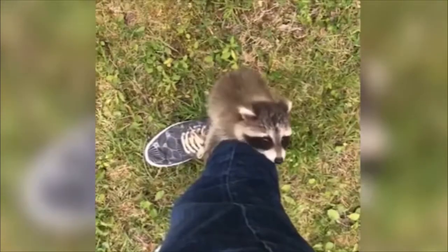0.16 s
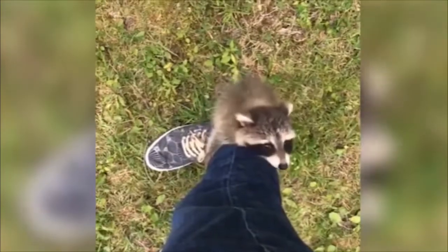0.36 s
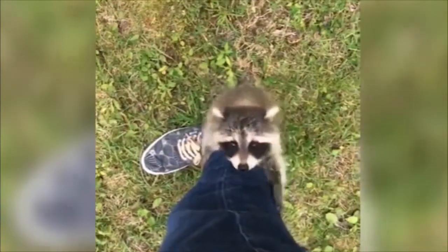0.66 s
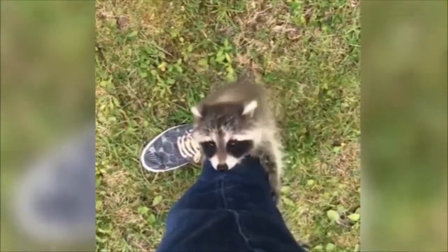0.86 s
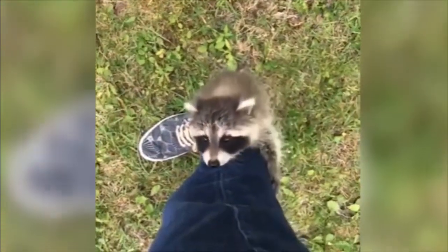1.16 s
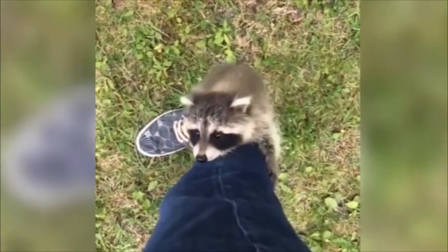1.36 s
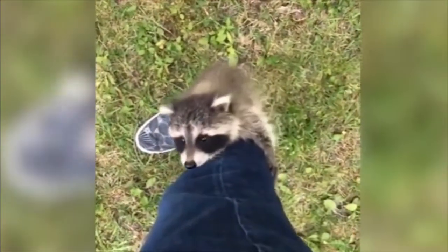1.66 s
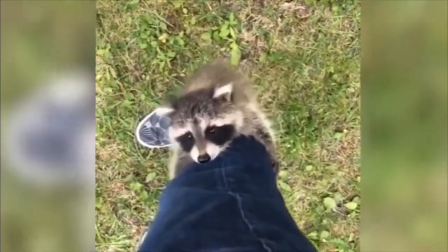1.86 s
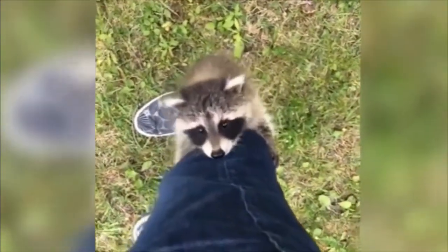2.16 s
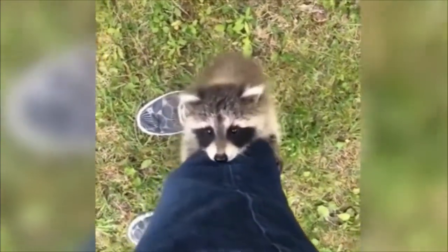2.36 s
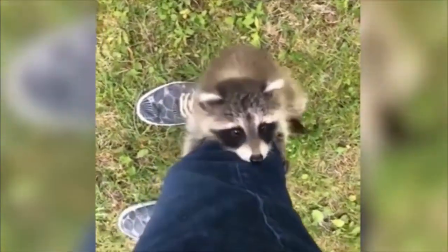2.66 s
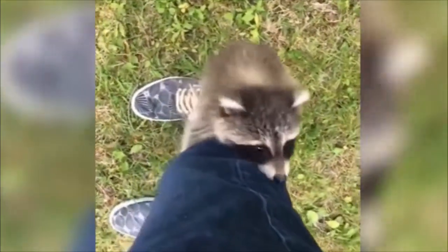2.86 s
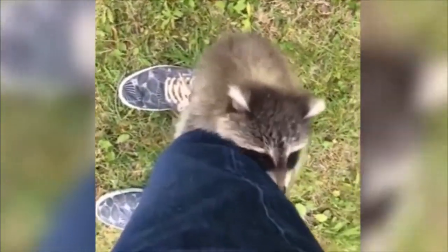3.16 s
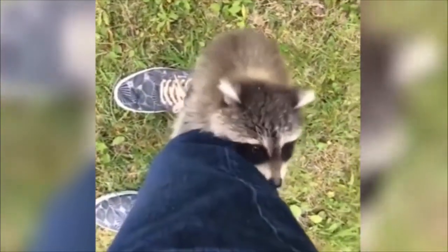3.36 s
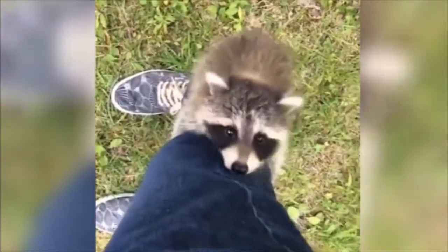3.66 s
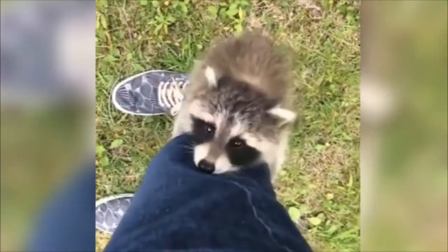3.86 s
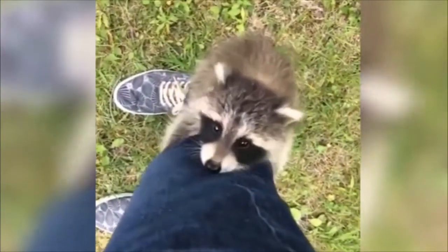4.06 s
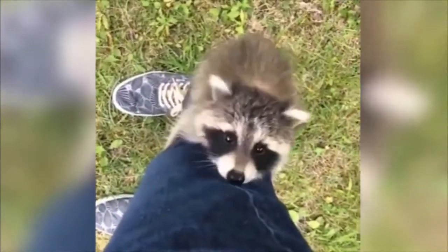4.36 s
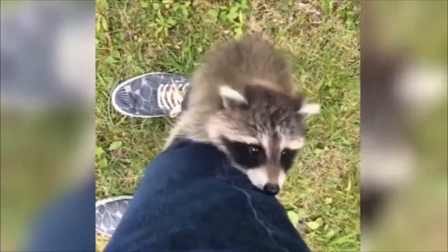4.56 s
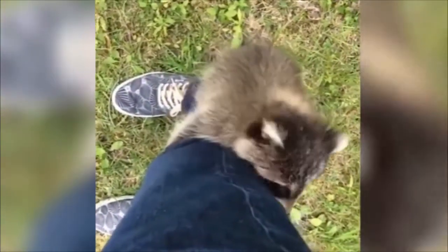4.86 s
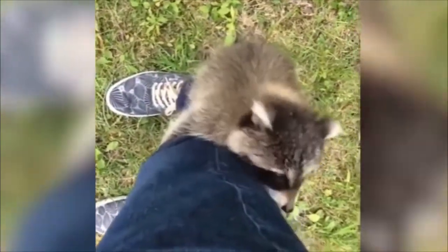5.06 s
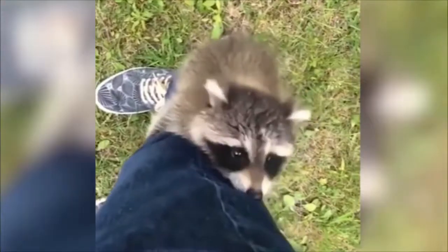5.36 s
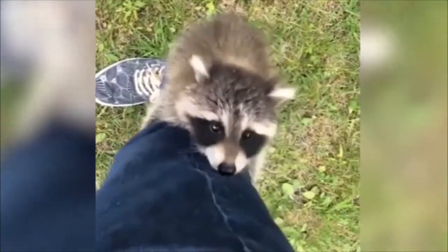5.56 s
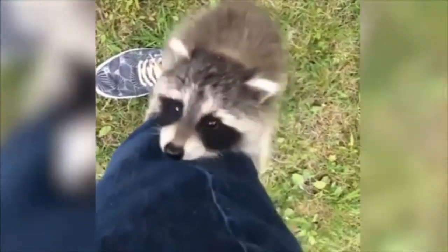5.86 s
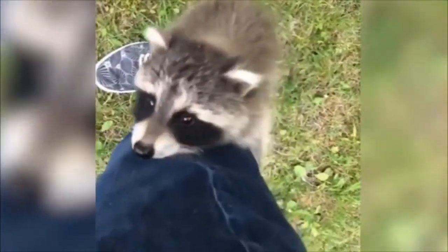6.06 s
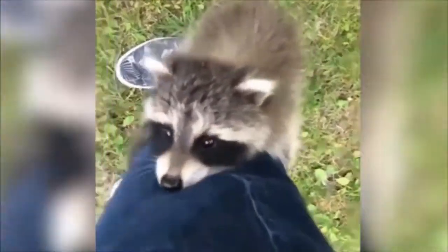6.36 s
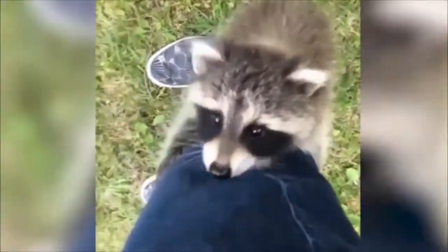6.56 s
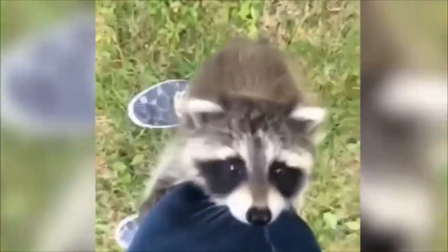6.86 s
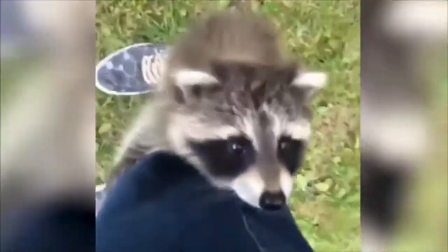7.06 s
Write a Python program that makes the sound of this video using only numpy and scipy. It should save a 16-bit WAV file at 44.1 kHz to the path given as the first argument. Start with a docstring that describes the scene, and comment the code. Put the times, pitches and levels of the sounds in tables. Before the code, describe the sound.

Rapid, raspy chirps and thin squeaks from a young raccoon up close, then claws snap on cloth and something bumps the microphone.

```python
"""Baby raccoon on a trouser leg

On a lawn, close up, on a hand-held phone. The raccoon chitters in runs of about 17 chirps a second,
each a few rough cycles of its voice, often led in by a thin squeak. As it climbs, claws catch the
denim, cloth rustles and air buffets the microphone; near the end something knocks and scrapes
against the phone. A soft outdoor hum lies far behind."""
import sys
import numpy as np
from scipy import signal
from scipy.fft import rfft, irfft
from scipy.io import wavfile
from scipy.ndimage import uniform_filter1d

SR = 44100
rng = np.random.default_rng(int(sys.argv[2]) if len(sys.argv) > 2 else 0)


def int16_out(signal):
    """Quantize to a 16-bit WAV file."""
    q = np.round(np.clip(np.atleast_2d(signal).T, -1, 1) * 32767)
    wavfile.write(sys.argv[1], SR, q.astype(np.int16))


N = 318402
T = np.arange(N) / SR

# chirps, run by run: t/s, relative level/dB, pitch/Hz, mouth against fundamental/dB, half length/s
CHIRPS = [(0.048, -34.5, 657, -10, 0.0037), (0.153, -36.5, 724, -9, 0.0034),
          (0.261, -35, 764, -5.5, 0.0026), (0.318, -41, 673, -2, 0.0035), (0.373, -35, 670, -7, 0.0045),
          (0.431, -33.5, 673, -10, 0.0033), (1.019, -47, 700, 13, 0.0034), (1.072, -34, 687, 15, 0.0019),
          (1.129, -27.5, 670, 4.5, 0.005), (1.196, -32, 635, 7, 0.0038), (2.581, -49, 620, -7, 0.0036),
          (2.636, -42.5, 689, -5, 0.0025), (2.695, -39.5, 762, 2, 0.0023), (2.757, -29.5, 654, -2, 0.0026),
          (2.813, -40.5, 649, 0, 0.0045), (2.873, -26, 684.4, -4, 0.0034), (2.934, -39, 712, -3, 0.0043),
          (3.518, -32, 709, -12.5, 0.0062), (3.579, -44, 626, 3, 0.0034), (3.638, -29.5, 635, 0.5, 0.0035),
          (3.692, -37.0, 622, 1, 0.0026), (3.75, -28.5, 607.4, 0, 0.0029), (4.412, -47, 628, -6, 0.0018),
          (4.448, -42.5, 800, 2.5, 0.0033), (4.501, -44, 639, 4, 0.0017), (4.553, -33.5, 685, 8.5, 0.0035),
          (4.605, -36, 710, 8, 0.0031), (4.657, -34.5, 680, 13, 0.0024), (4.708, -32, 697, 8, 0.0055),
          (4.761, -45.5, 630, 10, 0.0031), (4.808, -37, 655, -3.5, 0.0048), (4.861, -37.5, 641, -7, 0.0054),
          (4.913, -40, 640, -1.5, 0.0036), (4.968, -39, 636, -5.5, 0.0053), (5.026, -46.5, 608, 7, 0.0032),
          (5.076, -40, 654, -3, 0.0035), (5.133, -36.5, 640, -6, 0.0043), (5.195, -35.5, 619, -6, 0.0068),
          (5.247, -34.5, 627, 2.5, 0.0043), (5.303, -34, 619, 9, 0.0034), (5.36, -33, 549.6, 12, 0.0021),
          (5.98, -42.5, 682, -1, 0.0032), (6.034, -33, 611, 2, 0.0032), (6.093, -30.5, 597, 1.5, 0.0049),
          (6.149, -31.5, 647, 0, 0.0033), (6.208, -25.5, 654, 2, 0.0026), (6.266, -34, 632.5, 3, 0.0029),
          (6.322, -28.5, 640, 5, 0.0018), (6.378, -31, 609, 9, 0.0048), (6.444, -32, 620, 4, 0.0044),
          (6.508, -44.5, 710, 10, 0.0042), (6.574, -38.5, 733, 0, 0.0088), (6.639, -32.5, 747, 0, 0.0026),
          (6.699, -37.5, 700, 14, 0.0041), (6.823, -35.5, 654, 11, 0.0044)]
# vocal strain: t/s, rasp against mouth/dB, tick against chirp/dB, whistle against mouth/dB,
# throat tuning/ratio
STRAIN = [(.3, -11, -23, -5, 0.85), (1.13, -17, -31, 1.5, 1), (2.8, -22, -42, -1, 1),
          (3.7, -18, -25, -2.5, 1.033), (4.65, -17, -33.5, 1, 0.96), (4.8, -1, -19, -1, 1.07),
          (5.36, -3.5, -38, 1.5, 0.97), (6.05, -9.5, -27, 2, 0.88), (6.3, -5, -23, 3, 0.94),
          (6.8, -2, -13, 1, 0.91)]
# how unevenly the folds flap: t/s, roughness/0-1
FOLD_ROUGHNESS = [(.3, .35), (2.8, .6), (3.7, .45), (4.65, .55), (5.36, .7), (6.05, .9), (6.3, .75),
                  (6.8, .9)]
# mouth resonance: t/s, f/Hz
MOUTH_RESONANCE = [(.43, 1340), (1.05, 1420), (2.7, 1480), (3.62, 1458), (4.55, 1384), (4.71, 1536),
                   (5.35, 1678), (6.0, 1670), (6.2, 1973), (6.62, 1868)]
# upper throat resonances: f/Hz, width/Hz, gain/dB
THROAT_MODES = [(2250, 300, 5.5), (2613, 300, 8.5), (3090, 180, 0), (4420, 340, -7.5)]
# resonances of the wet tick: f/Hz, width/Hz, gain/dB
TICK_MODES = [(3630, 700, 0), (5380, 310, 3), (7300, 700, -6)]
# the band the nasal cavity swallows: t/s, f/Hz
NASAL_NOTCH = [(1.13, 2250), (2.8, 1820), (4.9, 1920), (5.1, 2370), (5.4, 2340), (6.0, 2600), (6.5, 2510)]
# squeaks ahead of the chirps: t/s, starting pitch/Hz, relative level of tone/dB, of octave/dB
LEAD_SQUEAKS = [(4.5, 1216, -48, -58), (4.66, 1266, -58, -65), (4.8, 1400, -62, -61),
                (5.18, 1440, -62, -58), (5.3, 1443, -64, -53), (6.05, 1227, -54, -53.5),
                (6.3, 1209, -53.5, -50), (6.6, 1202, -67, -48), (6.82, 1215, -66, -54)]
# individually shaped squeaks and squeals, most leading into or overlapping a chirp:
# start/s, end/s, roughness/0-1, first f/Hz, last f/Hz, relative level of tone/dB, of octave/dB
SHAPED_SQUEAKS = [(0.456, 0.521, 0.7, 1637, 1510, -52.5, -65), (0.479, .518, 0.24, 2035, 1850, -48.5, -74),
                  (1.044, 1.08, 0.2, 1270, 1145, -49, -53), (1.102, 1.135, 0.64, 1800, 2060, -46.5, -73),
                  (1.146, 1.215, 0.8, 1630, 1695, -47, -69), (4.678, 4.719, 0.8, 1457, 1529, -45, -52.5),
                  (4.686, 4.721, 0.3, 2244, 2275, -51, -60), (4.735, 4.758, .3, 1380, 1190, -59, -55.5),
                  (6.126, 6.15, 0.2, 1233, 1030, -57, -48), (6.361, 6.379, 0.3, 1194, 1070, -41, -47),
                  (6.492, 6.513, 0.2, 1184, 1096, -50, -49), (6.794, 6.816, 0.2, 1264, 1180, -60, -43.5)]
# rasp through the most strained run: t/s, relative level/dB
HOARSE_LEVEL = [(4.66, -75), (4.70, -49), (4.75, -55), (4.8, -48.5), (4.92, -46), (5.02, -50.5),
                (5.18, -48), (5.24, -44), (5.37, -50), (5.44, -75)]
# resonances of that rasp: f/Hz, width/Hz, gain/dB
HOARSE_MODES = [(1610, 420, 1), (2200, 160, 3.5), (2670, 320, -2.5), (3010, 190, 3), (4150, 240, -5)]

# fur and paws stroking the denim: t/s, width/s, relative level/dB
RUBS = [(.28, 0.34, -58), (1.18, 0.094, -54.5), (2.42, 0.26, -49.5), (2.92, 0.18, -52), (3.72, 0.08, -56),
        (5.28, 0.093, -51.5), (5.7, 0.99, -52.5), (6.285, 0.032, -42), (6.42, 0.12, -43.5),
        (6.705, .012, -39), (6.74, 0.023, -32.5), (6.8, 0.13, -40), (6.92, 0.018, -38), (7.05, 0.17, -53.5)]
# their spectrum: f/Hz, gain/dB
RUB_SPECTRUM = [(100, 10), (300, 7.5), (1500, -1), (3000, -3), (4500, -3.5), (5800, -2.5), (7500, -1.5),
                (11000, -3.5), (12000, -10)]
# rustle of holding on: f/Hz, gain/dB
CLING_SPECTRUM = [(100, -1.5), (300, 14), (1500, -0.5), (3000, 0), (4500, -7), (5800, 3.5), (7500, -1),
                  (10500, -4), (12000, -10.5)]
# the trouser leg shifting: t/s, width/s, level/dB
CLOTH_SHIFTS = [(2.37, 0.1, -55.5), (4.045, 0.014, -49.5), (6.98, 0.039, -49.5), (7.086, 0.007, -42.5)]
# claws snapping in the cloth: t/s, peak/dB, decay/s
CLAW_SNAPS = [(6.2668, -11, 0.00037), (6.279, -3.5, 0.00078), (7.085, -35.5, 0.0048)]
# their spectrum: f/Hz, gain/dB
CLAW_SPECTRUM = [(60, -11), (200, 7), (600, -3), (1600, 10), (3300, 2.5), (5000, -12), (8000, -7.5),
                 (12000, -25)]

# modes of the phone's case: f/Hz, width/Hz, gain/dB
CASE_MODES = [(352, 124, -5), (653, 74, -3), (1053, 41, -0.5), (1170, 39, -4.5), (1324, 32, -3),
              (1543, 39, -5), (1707, 28, 1.5), (2130, 42, -4.5), (3020, 38, -6.5), (3300, 44, -5),
              (4180, 37, -2)]
# contact noise through the case: f/Hz, gain/dB
CASE_SPECTRUM = [(60, 5), (200, 2), (400, 3.5), (1200, 2), (1800, -2), (2600, -1), (4800, -2), (6000, 1),
                 (7200, -7.5), (9000, -16), (12000, -13)]
# scrapes over the case: t/s, width/s, level/dB
SCRAPES = [(6.72, 0.0092, -28.5), (6.745, 0.017, -20), (6.845, 0.055, -40)]
# slower, duller drags after them: t/s, width/s, level/dB
DRAGS = [(6.85, 0.034, -37.5), (6.915, .017, -30.5)]
# their spectrum: f/Hz, gain/dB
DRAG_SPECTRUM = [(80, 1.5), (620, 0.5), (1000, -10), (1500, -13), (2300, -9), (3000, -24), (9000, -26)]
# knocks on the case: t/s, peak/dB, contact time/s
KNOCKS = [(6.7321, -5, 0.00016), (6.7372, -14, 0.000065), (6.7536, -10.5, 0.00012)]
# soft bumps on the phone: t/s, f/Hz, width/s, envelope peak/dB
BUMPS = [(4.496, 43.8, 0.014, -23.5), (4.606, 49.6, 0.022, -28.5), (4.877, 38.3, 0.031, -23.5),
         (5.519, 48, 0.017, -25.5), (5.646, 34.7, 0.026, -21), (6.248, 42, 0.018, -24.5),
         (6.285, 191, 0.0088, -31.5), (6.899, 109, 0.014, -30), (6.941, 133, 0.0091, -26.5),
         (6.951, 61, 0.0053, -18.5), (7.101, 63.7, 0.0094, -27)]

# gusts on the microphone: t/s, width/s, level/dB
GUSTS = [(4.39, 0.034, -35.5), (4.8, 0.1, -40), (5.6, 0.1, -33.5), (5.84, 0.03, -37), (6.21, 0.1, -33),
         (6.49, 0.027, -32.5), (6.85, 0.16, -35)]
# their spectrum: f/Hz, gain/dB
GUST_SPECTRUM = [(15, -4), (35, 7), (60, -0.5), (90, -5), (130, -20.5), (300, -33.5), (700, -69)]
# steady air on the microphone: f/Hz, gain/dB
BREEZE_SPECTRUM = [(15, -10), (35, 4), (60, -2), (90, -15), (130, -15), (300, -53), (700, -65)]
# distant outdoor hum: f/Hz, gain/dB
HUM_SPECTRUM = [(30, 8), (75, 7.5), (130, 1.5), (200, -6), (400, -14), (620, -2), (1000, 1), (1250, -2),
                (1650, -11), (2200, -15.5), (4500, -17.5), (9000, -29.5)]
# its rise and fall: t/s, relative level/dB
HUM_LEVEL = [(0, -49.5), (1.0, -54), (3.6, -55.5), (5.8, -55.5), (6.6, -53), (7.2, -63.5)]
# a faint low drone: t/s, level/dB
DRONE_LEVEL = [(.6, -67), (1.2, -56), (2.5, -57.5), (3.1, -65)]


def raccoon(squeak_db=5.5, notch_width_hz=120):
    """The voice, close to the microphone: chirps, squeaks and rasp, notched by the nasal cavity."""
    voice = chitter() + amp(squeak_db) * squeaks() + hoarseness()
    return voice - moving_ring(voice, curve(NASAL_NOTCH), notch_width_hz)


def chitter(mouth_scatter=.06):
    """Runs of chirps; opening the mouth shifts power from the fundamental to its resonance."""
    out = np.zeros(N)
    shapes = rng.uniform(-1.006, 1, len(CHIRPS))  # the mouth never opens the same way twice
    for (s, db, pitch_hz, open_db, half_s), shape in zip(CHIRPS, shapes):
        mouth_hz = at(MOUTH_RESONANCE, s)[0] * (1 + mouth_scatter * shape)
        voice_db = db - 10 * np.log10(1 + amp(open_db) ** 2)
        call = chirp(s, half_s, pitch_hz, mouth_hz, voice_db, voice_db + open_db)
        add(out, s - len(call) / SR / 2, call)
    return out


def chirp(s, half_s, pitch_hz, mouth_hz, voice_db, mouth_db, hiss_db=-15, hum_db=-26):
    """The folds flap for a few uneven cycles and ring the mouth; a whistle joins, strain adds rasp."""
    rasp_db, tick_db, whistle_db, tuning = at(STRAIN, s)
    rough = at(FOLD_ROUGHNESS, s)[0]
    clean = np.sqrt(1 - rough ** 2)
    t = np.arange(-int(.06 * SR), int(.06 * SR)) / SR
    push = np.exp(-.5 * abs(t / (half_s * np.where(t < 0, .87, .74))) ** 1.58)
    opening = np.interp(t - .0002, t, push) ** 1.05  # lags just behind the push
    skirt = np.exp(-abs(t) / np.where(t < 0, .062, .068))  # weak hoarse build-up and fade

    wobble = (.043 + .058 * rough ** 4) * unit(uniform_filter1d(noise(len(t)), size=60))
    phase = phase_of(pitch_hz * (1 + .06916 * (push - .8) + wobble))  # pitch arches with the push
    pulses = unit(sum(np.cos(k * phase) for k in range(2, 7)))
    hiss = rough * unit(band(noise(len(t)), 790, 2700, order=1))
    folds = opening * (clean * pulses + hiss) + amp(hiss_db) * skirt * hiss
    puff = push * unit(band(noise(len(t)), 220, 1050, order=2))
    voice = (push + amp(hum_db) * skirt) * np.cos(phase) + rough ** 2 * puff / 2

    # the whistle slides upward through the mouth resonance
    whistle = opening * np.cos(phase_of(mouth_hz * (1 + .0594 * np.tanh(t / half_s) + wobble)))
    mouth = band(ring(folds, mouth_hz, width=600), 1095, 1.327 * mouth_hz + 150, order=3)
    mouth = unit(mouth) + amp(whistle_db) * clean * unit(whistle)
    tract = unit(mouth) + amp(rasp_db) * throat(folds, THROAT_MODES, tuning)
    tick = wet_tick(push * np.exp(-(2 * t / half_s) ** 2)) * np.hypot(amp(voice_db), amp(mouth_db))
    return .36 * (amp(voice_db) * unit(voice) + amp(mouth_db) * tract + amp(tick_db) * tick)


def throat(x, modes, tuning=1):
    """The throat's resonances shape a rasp, rms 1."""
    return unit(sum(amp(db) * ring(ring(x, tuning * hz, width), tuning * hz, 2 * width)
                    for hz, width, db in modes))


def wet_tick(envelope, scatter_db=4):
    """The folds part with a wet tick that rings a little differently each time."""
    burst = envelope * noise(len(envelope))
    return unit(sum(amp(db + scatter_db * rng.standard_normal()) * ring(burst, hz, width)
                    for hz, width, db in TICK_MODES))


def squeaks(lead_s=.022, gap_s=.00099, usual_chirp_db=-35):
    """A falling squeak, often hoarse, leads into each later chirp; individually shaped ones join in."""
    out = np.zeros(N)
    for (s, chirp_db, *_), (stretch, bend, force, fray) in zip(
            CHIRPS, rng.uniform(-1, 1, (len(CHIRPS), 4))):
        if s > LEAD_SQUEAKS[0][0] - lead_s:
            hz, db, octave_db = at(LEAD_SQUEAKS, s)
            length = lead_s * (1 + .3 * stretch)
            fall = .12 * (1 + .6 * bend)
            rough = np.interp(fray, (-1, 1), (.45, .95))
            call = squeak(length, rough, hz, hz * (1 - fall), db, octave_db, waver=.027)
            gain_db = .59 * (chirp_db - usual_chirp_db) + 1.5 * force  # louder with a louder chirp
            add(out, s - gap_s - length, amp(gain_db) * call)
    for start, end, *shape in SHAPED_SQUEAKS:
        add(out, start, squeak(end - start, *shape, waver=.022))
    return out


def squeak(length, rough, first_hz, last_hz, db, octave_db, waver):
    """Tight folds whistle thinly, sliding and swelling; irregular flapping frays the tone."""
    progress = np.linspace(0, 1, int(length * SR))
    hz = last_hz + (first_hz - last_hz) * (1 - progress) ** 1.7
    wobble = waver * unit(uniform_filter1d(noise(len(hz)), size=40))
    tone = np.exp(2j * np.pi * np.cumsum(hz * (1 + wobble)) / SR)
    fray = unit(band(noise((2, len(hz))), 20, 270, order=3))
    flutter = np.sqrt(1 - rough ** 2) + rough * (fray[0] + 1j * fray[1]) / np.sqrt(2)
    swell = unit(np.sin(np.pi * progress) * (.5 + progress))
    return np.sqrt(2) * swell * np.imag(flutter * tone * (amp(db) + amp(octave_db) * tone))


def hoarseness(ahead_s=.01, swell_s=.0098):
    """The strained throat keeps rasping, hardest as pressure builds ahead of each chirp."""
    breath = noise() * amp(2 * walk(120))
    start, end = HOARSE_LEVEL[0][0], HOARSE_LEVEL[-1][0]
    pressure = swells([(s - ahead_s, swell_s, 0) for s, *_ in CHIRPS if start < s < end], rest_db=-7.5)
    return throat(breath, HOARSE_MODES) * pressure * amp(curve(HOARSE_LEVEL))


def lawn_scatter(x, wet_db=-15, t60_s=.11):
    """Nearby legs and lawn scatter a short, weak tail back to the microphone."""
    t = np.arange(SR // 4) / SR
    tail = noise(len(t)) * amp(-60 * t / t60_s) * (t > .004)
    return x + amp(wet_db) * signal.fftconvolve(x, tail / np.linalg.norm(tail))[:N]


def denim(rub_db=-1, grain_db=2, cling_db=-59, level_drift_db=.7):
    """Threads slip under fur and paws, and the trouser leg shifts with a dull rumble."""
    grain = noise() * unit(amp(grain_db * walk(300)))
    rub = colour(grain, RUB_SPECTRUM) * amp(rub_db) * swells(RUBS)
    cling = colour(noise(), CLING_SPECTRUM) * amp(cling_db + level_drift_db * walk(13))
    rumble = unit(band(noise(), 128, 305, order=2)) * swells(CLOTH_SHIFTS)
    return rub + cling + rumble


def claw(s, decay_s):
    """A claw comes free of the cloth: one snap and a brief crackle, peak 1."""
    t = np.arange(SR // 25) / SR
    crackle = noise(len(t)) * np.exp(-t / decay_s)
    crackle[0] += 6  # the snap
    contact = np.zeros(N)
    add(contact, s, crackle)
    snap = colour(contact, CLAW_SPECTRUM)
    return snap / abs(snap).max()


def handling(slips_per_s=450):
    """Right on the phone: a gritty scrape with hard knocks, a stick-slip drag, and soft bumps."""
    scrape = unit(phone_case(noise())) * swells(SCRAPES)
    slips = (rng.random(N) < slips_per_s / SR) * rng.uniform(-.96, 1, N)
    drag = unit(colour(slips, DRAG_SPECTRUM)) * swells(DRAGS)
    knocks = sum(amp(db) * knock(s, contact_s) for s, db, contact_s in KNOCKS)
    bumps = sum(amp(db) * np.exp(-.5 * ((T - s) / width) ** 2) * np.sin(2 * np.pi * hz * (T - s))
                for s, hz, width, db in BUMPS)
    return scrape + drag + knocks + bumps


def knock(s, contact_s):
    """One hard push and rebound on the case, peak 1."""
    u = np.clip((T - s) / contact_s - 2, -10, 10)
    hit = phone_case(-u * np.exp(-u ** 2 / 2))
    return hit / abs(hit).max()


def phone_case(x, ring_db=8):
    """Contact noise rings the case's modes on its way to the microphone."""
    ringing = sum(amp(db) * ring(x, hz, width) for hz, width, db in CASE_MODES)
    return colour(x + amp(ring_db) * ringing, CASE_SPECTRUM)


def wind(breeze_db=-50):
    """Air rumbles on the microphone: a steady breeze with gusts."""
    breeze = amp(breeze_db) * colour(noise(), BREEZE_SPECTRUM)
    return breeze + swells(GUSTS) * colour(noise(), GUST_SPECTRUM)


def distant_hum(drone_hz=92.5, hum_db=4.5, level_drift_db=.7):
    """Far off, a soft outdoor wash that eases after the first second and fades at the end, and a faint low
    drone."""
    drone = unit(ring(noise(), drone_hz, width=5.9)) * amp(curve(DRONE_LEVEL))
    wash = colour(noise(), HUM_SPECTRUM) * amp(curve(HUM_LEVEL) + hum_db + level_drift_db * walk(10))
    return drone + wash


def amp(db):
    """Decibels to gain."""
    return 10 ** (np.asarray(db) / 20)


def unit(x):
    """Scale to rms 1."""
    return x / np.sqrt(np.mean(x ** 2) + 1e-18)


def curve(rows):
    """Join (t/s, value) rows with straight lines."""
    return np.interp(T, *np.transpose(rows))


def at(rows, s):
    """The columns of a control curve at one moment."""
    times, *columns = np.transpose(rows)
    return [np.interp(s, times, column) for column in columns]


def swells(rows, rest_db=-150):
    """Gain of bell-shaped (t/s, width/s, level/dB) swells, adding in power over a resting level."""
    power = sum(amp(db) ** 2 * np.exp(-np.minimum(((T - s) / width) ** 2, 20)) for s, width, db in rows)
    return np.sqrt(amp(rest_db) ** 2 + power)


def noise(size=N):
    """White noise."""
    return rng.standard_normal(size)


def walk(rate_hz):
    """Smooth random drift, rms 1."""
    hold = int(SR / rate_hz)
    steps = np.repeat(noise(N // hold + 1), hold)
    return unit(uniform_filter1d(uniform_filter1d(steps, hold), hold)[:N])


def phase_of(hz):
    """Running phase of a moving frequency, from a random start."""
    return 2 * np.pi * (np.cumsum(hz) / SR + rng.random())


def colour(x, points):
    """Filter by a (f/Hz, gain/dB) spectrum, keeping the power of white noise."""
    hz, db = np.transpose(points)
    f = np.maximum(np.arange(N // 2 + 1) * SR / N, 1)
    return irfft(rfft(x) * unit(amp(np.interp(np.log(f), np.log(hz), db))), N)


def band(x, low_hz, high_hz, order):
    """Band-pass."""
    return signal.sosfilt(signal.butter(order, [low_hz, high_hz], "band", fs=SR, output="sos"), x)


def ring(x, hz, width):
    """One resonance, gain 1 at its centre."""
    return signal.lfilter(*signal.iirpeak(hz, hz / width, fs=SR), x + 1e-18)


def moving_ring(x, hz, width):
    """One resonance whose centre moves, gain 1 at that centre."""
    turn = np.exp(2j * np.pi * np.cumsum(hz) / SR)
    pole = np.exp(-np.pi * width / SR)
    return 2 * np.real(turn * signal.lfilter([1 - pole], [1, -pole], x / turn + 1e-18))


def add(out, start, x):
    """Mix x into out from a time in seconds."""
    i = int(start * SR)
    part = x[max(-i, 0):N - i]
    out[max(i, 0):max(i, 0) + len(part)] += part


def scene():
    """Everything as it reaches the phone's microphone, in mono."""
    voice = lawn_scatter(raccoon())
    climbing = denim() + sum(amp(db) * claw(s, decay_s) for s, db, decay_s in CLAW_SNAPS)
    return (voice + climbing + handling() + wind() + distant_hum())[None]


def record(dry, top_hz=11950):
    """The phone cuts the top steeply."""
    return signal.sosfilt(signal.ellip(10, .2, 80, top_hz, fs=SR, output="sos"), dry)


dry = scene()
out = record(dry)
int16_out(out)
```